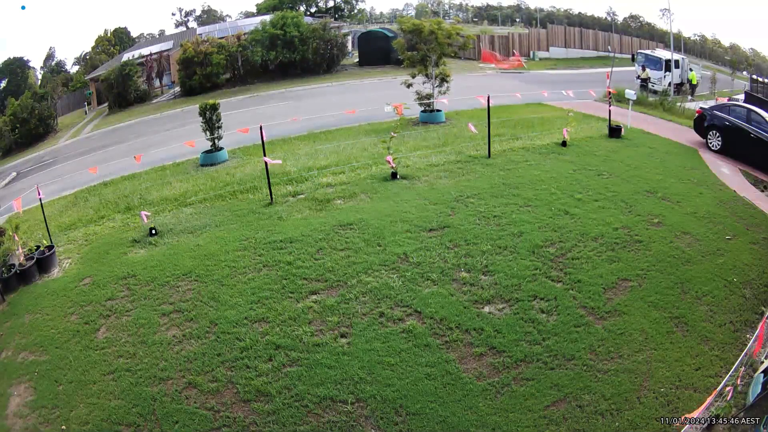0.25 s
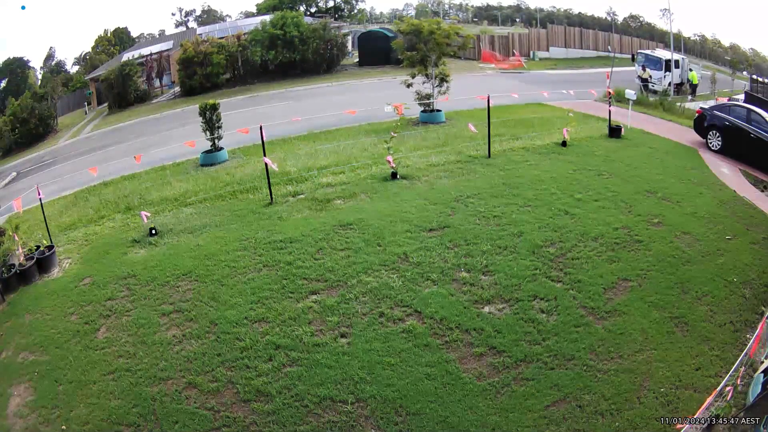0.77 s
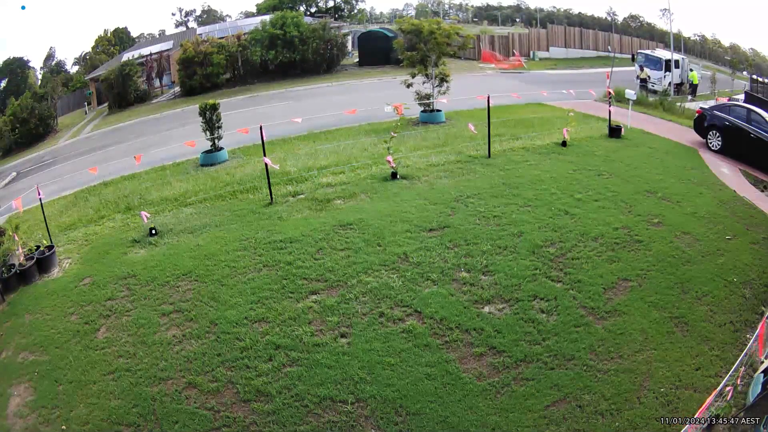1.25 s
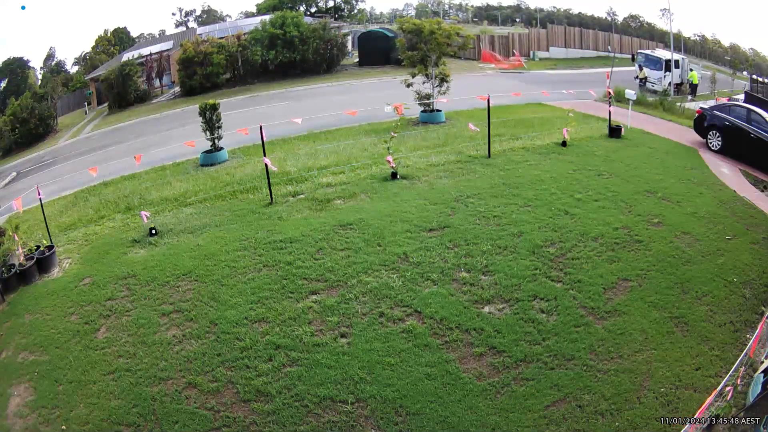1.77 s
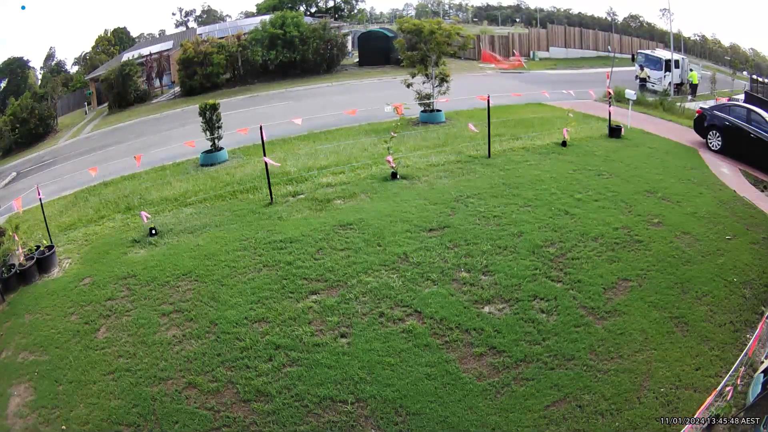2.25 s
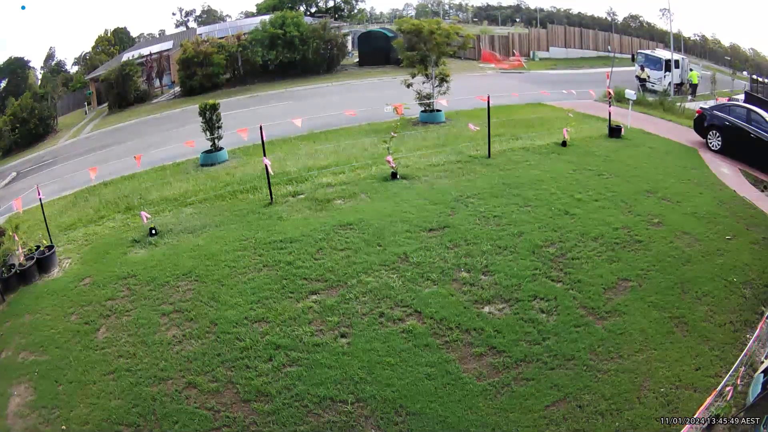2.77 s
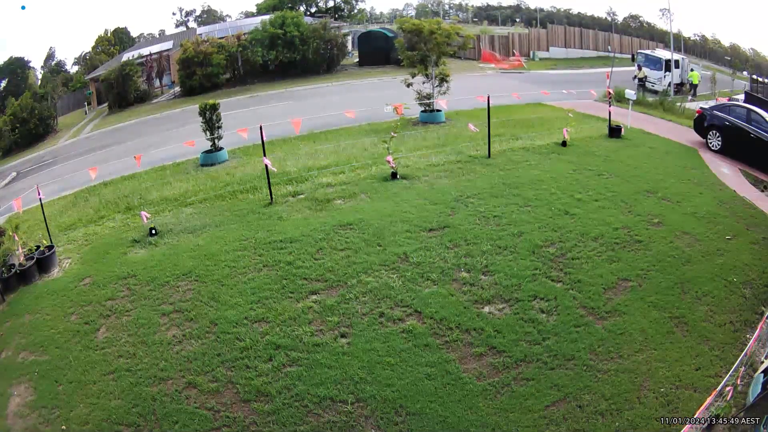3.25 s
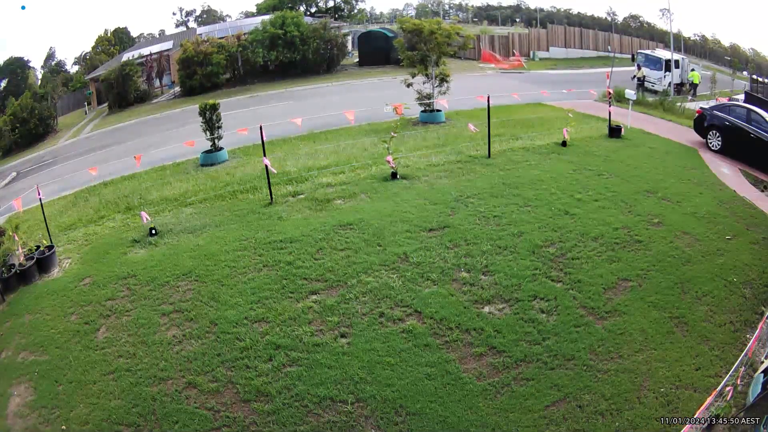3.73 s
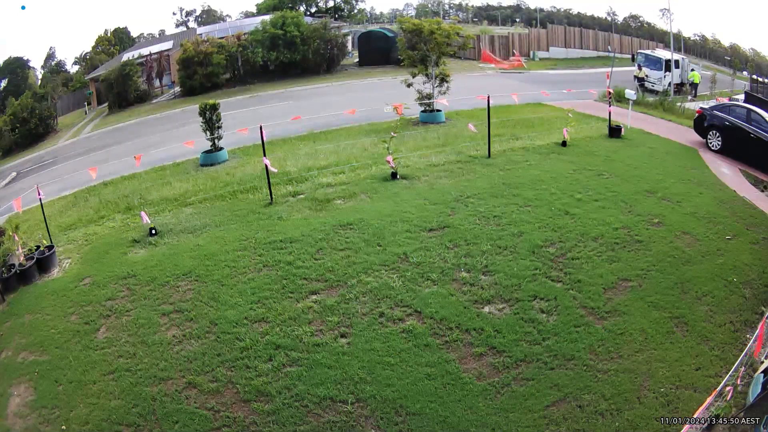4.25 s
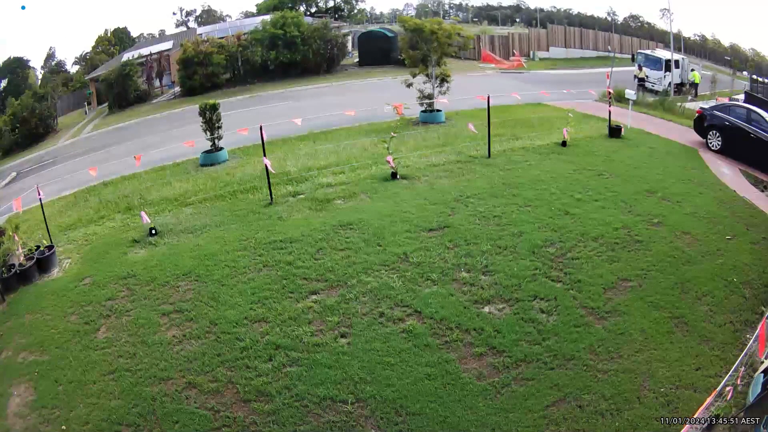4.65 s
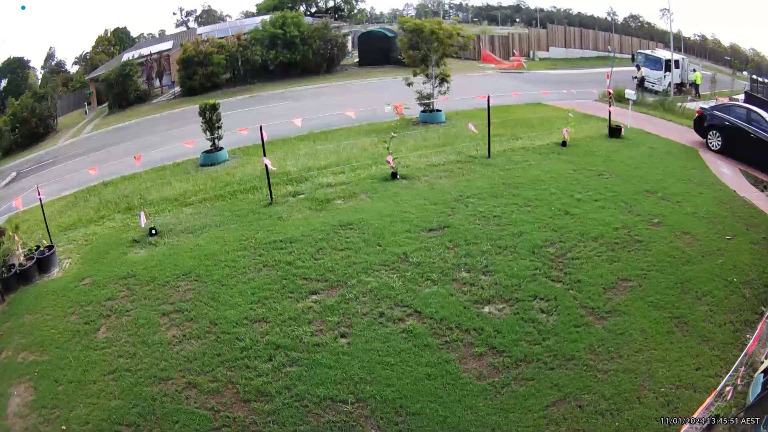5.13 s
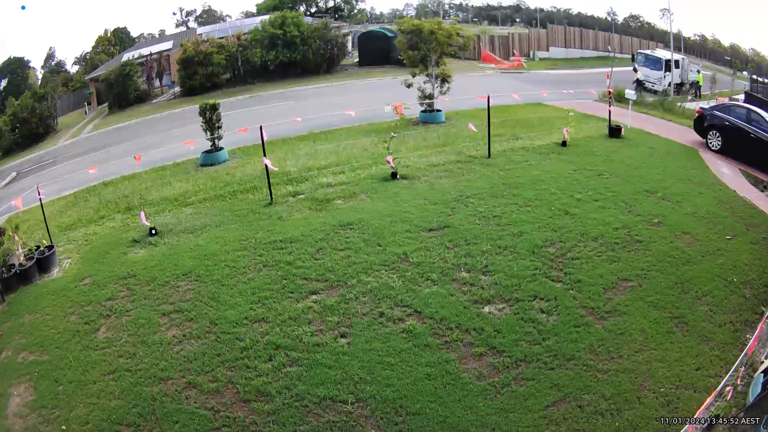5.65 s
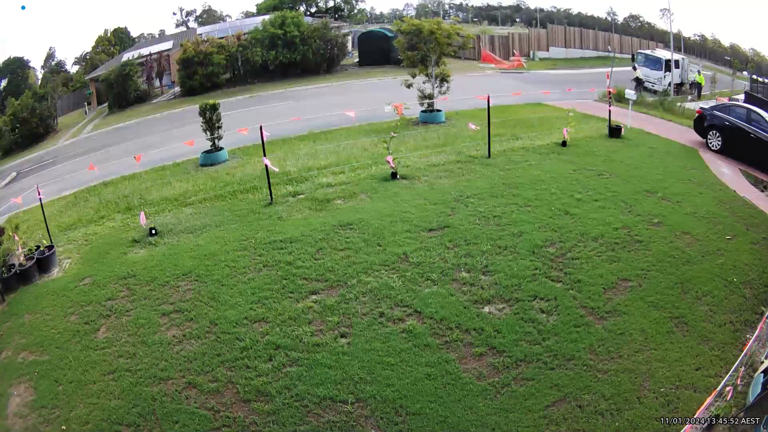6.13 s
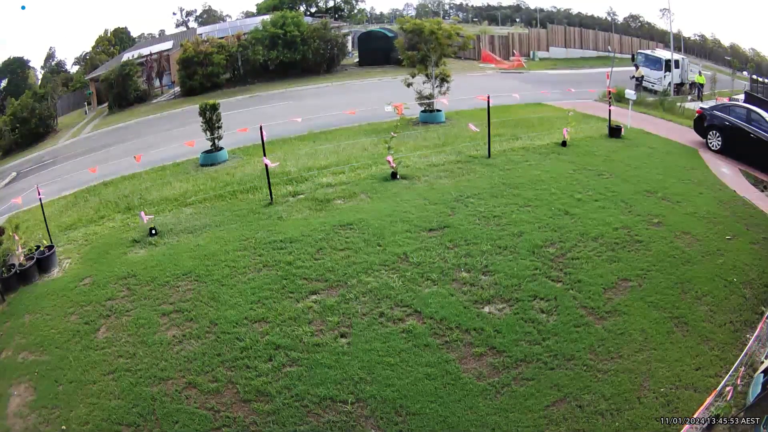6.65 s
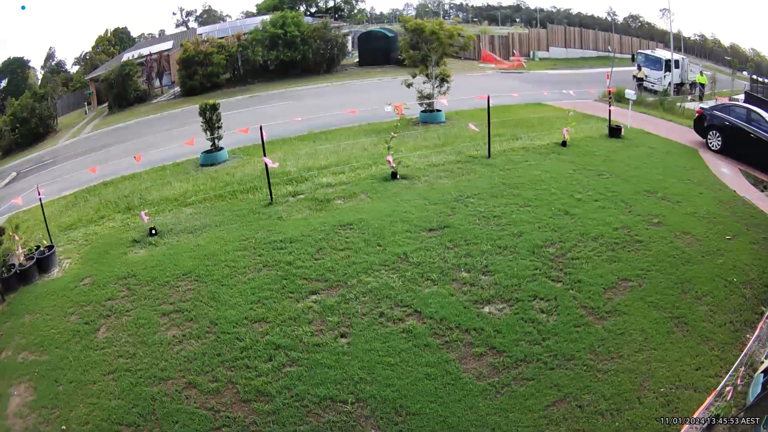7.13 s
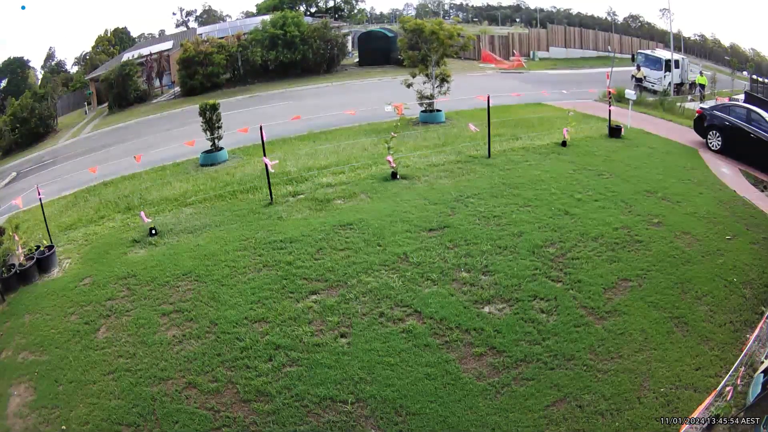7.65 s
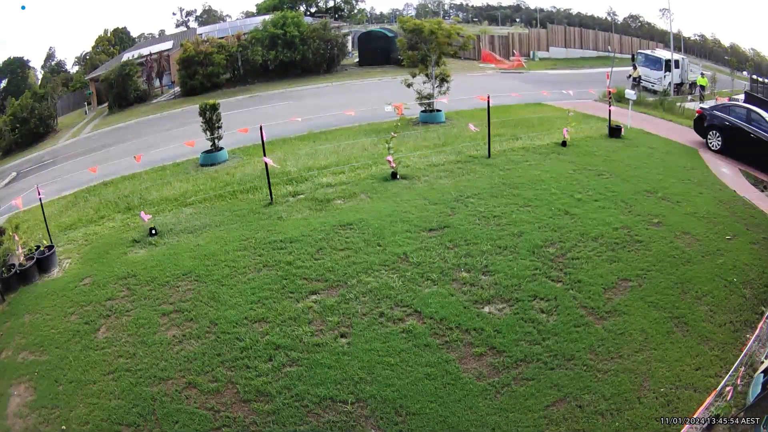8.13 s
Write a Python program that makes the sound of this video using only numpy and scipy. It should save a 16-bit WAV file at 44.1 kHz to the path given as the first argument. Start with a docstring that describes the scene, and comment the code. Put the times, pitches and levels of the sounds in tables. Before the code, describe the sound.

A petrol line trimmer runs near a house wall on a lawn, over very faint low street noise. It starts with a fading rush, then revs up and bites from about 0.3 to 1.4 seconds: dense crackling grass hiss, sharp grit snaps and a short stalk rasp. From 1.5 to 2.1 it mostly whirs and buzzes. A cluster of snaps at 2.1 begins more heavy shredding until about 3.2. Lighter sweeps follow, with a crackling bite from 4.2 to 4.7, then a quieter, wavering engine around 5. At 5.85 a hard burst of clicks and rasping hits, followed by a hollow whine to 6.4 and a brief lull. From 6.85 to 8.1 the strongest cutting returns, harsh and full of snaps, then eases off. Sound is close, with tight wall doubling, rounded peaks and muted top treble.

```python
"""Line trimmer beside a house

A petrol line trimmer is revved in bursts as its head sweeps over a lawn, above a quiet street noise.
Two whirling lines hum as partials and tear the air as pulsed noise; a two-stroke engine buzzes below.
Each bite shreds grass in dense random ticks over a hiss, with snaps of grit and rasps of tough stalks.
The house wall doubles the ticks and snaps, and a narrow-band microphone rounds peaks and cuts the top."""
import sys
import numpy as np
from scipy import signal
from scipy.fft import rfft, irfft
from scipy.io import wavfile
from scipy.ndimage import uniform_filter1d, map_coordinates

SR = 44100
rng = np.random.default_rng(int(sys.argv[2]) if len(sys.argv) > 2 else 0)


def master_out(mix):
    """Clip the mix to full scale and print it as 16-bit PCM to the path in sys.argv[1]."""
    frames = np.transpose(np.atleast_2d(mix))
    ceiling = np.clip(frames, -1, 1)
    pcm = np.round(ceiling * 32767).astype(np.int16)
    wavfile.write(sys.argv[1], SR, pcm)


N = 369999

# colour of grass spray, snaps and exhaust gas: (frequency [Hz], level [dB])
SPRAY_COLOUR = [(600, -29), (1000, -2), (1250, -20.5), (1450, -5.5), (1850, -4.5), (2080, -4.5), (2400, -1),
                (3300, -0.5), (4200, 0.5), (5850, -1), (6450, -9.5), (7400, -15), (8200, -29),
                (9000, -26.5)]
# the head swings nearer and further along the house: (time [s], lag of the wall reflection [ms])
WALL_LAG = [(0, 2.35), (.4, 2.26), (.85, 2.11), (1.5, 2.27), (2.15, 2.32), (2.5, 2.18), (2.85, 2.12),
            (3.2, 2.2), (3.45, 2.34), (3.9, 2.34), (4.15, 2.18), (4.4, 2.12), (4.8, 2.27), (5.7, 2.47),
            (6.9, 2.33), (7.15, 2.18), (7.38, 2.11), (7.65, 2.18), (7.9, 2.28), (8.15, 2.33)]
# skimming harder ground, whose bounce hollows the hiss: (time [s], reflected share [0-1])
HARD_GROUND = [(5.1, 0.02), (5.55, 0.34), (5.9, 0.38), (6.1, 0.55), (6.4, 0.4), (6.8, 0.23)]
WALL_SHARE = .9  # the wall returns snaps almost whole
CRUISE_HZ = 145  # line passes per second at which the speed-bound levels and colours are neutral


def undb(db):
    """Decibels to gain."""
    return 10 ** (np.asarray(db) / 20)


def unit(x):
    """Scale to rms 1."""
    return x / np.sqrt(np.mean(x ** 2))


def power_db(gains):
    """Level of unrelated sounds together: their powers add."""
    return 10 * np.log10(sum(g ** 2 for g in gains))


def curves(table):
    """Each column of a table of (time [s], ..) rows, drawn as straight lines per sample."""
    s, *columns = np.transpose(table)
    return [np.interp(np.arange(N) / SR, s, c) for c in columns]


def walk(rate):
    """Random levels, `rate` of them per second, joined by slopes; spread near 1."""
    k = int(SR / rate)
    held = np.repeat(rng.standard_normal(N // k + 1), k)
    return 1.25 * uniform_filter1d(held, k)[:N]


def swell(start, end, attack, release):
    """Gain that rises, holds from start to end and dies away, 20 dB per attack or release time [s]."""
    t = np.arange(0, N / SR, .001)
    distance = np.maximum((start - t) / attack, (t - end) / release)
    gain = undb(-20 * np.clip(distance, 0, 10))
    return np.interp(np.arange(N) / SR, t, gain)


def colour(x, points, size=4096):
    """Causal filter through (frequency [Hz], level [dB]) points, from the cepstrum of the log gain."""
    hz, db = np.transpose(points)
    bins_hz = np.arange(size // 2 + 1) * SR / size
    gain_db = np.interp(np.log(bins_hz + 1), np.log(hz), db)
    cepstrum = irfft(np.log(undb(gain_db)))
    # folding the cepstrum forward in time makes the filter minimum phase
    cepstrum[1:size // 2] *= 2
    cepstrum[size // 2 + 1:] = 0
    impulse = irfft(np.exp(rfft(cepstrum)))
    return signal.fftconvolve(x, impulse)[:len(x)]


def split(x, hz):
    """The parts of a sound below and above a frequency."""
    low = signal.sosfiltfilt(signal.butter(4, hz, fs=SR, output="sos"), x)
    return low, x - low


def delayed(x, seconds):
    """The sound a moment later; the lag may glide."""
    return map_coordinates(x, [np.arange(N) - seconds * SR], order=3)


def per_turn(turns, depth):
    """A swell once in every turn."""
    return unit(np.exp(depth * np.cos(2 * np.pi * turns)))


def harmonics(turns, orders, flutter_db):
    """Partials locked to a rotation flutter in disturbed air and swell across housing resonances."""
    # resonances of the housing: (frequency [Hz], half width [Hz], lift [dB])
    housing = [(215, 14, 2.5), (388, 32, 4), (615, 28, 5)]
    rate, grid_hz = np.gradient(turns) * SR, np.arange(SR // 20)
    lift = sum(db * np.exp(-((grid_hz - hz) / width) ** 2) for hz, width, db in housing)
    out = np.zeros(N)
    for k, db in orders:
        level_db = db + np.interp(k * rate, grid_hz, lift) + flutter_db * walk(22)
        out += undb(level_db) * np.sin(2 * np.pi * (k * turns + rng.random()))
    return out * np.sqrt(2)


def bounced(x):
    """Hard ground adds a bounce so close behind that it hollows the treble."""
    ground, = curves(HARD_GROUND)
    notch_hz = 3670
    return x + ground * delayed(x, .5 / notch_hz)


def surroundings(x):
    """A bounce off the ground, then faint scatter from fences and trees as decaying noise."""
    x = bounced(x)
    t = np.arange(SR // 2) / SR
    # the scatter starts after 8 ms and falls 60 dB in every 40 ms
    tail = rng.standard_normal(len(t)) * undb(-60 * t / 0.04) * (t > .008)
    return x + undb(-14.0) * signal.fftconvolve(x, tail / np.linalg.norm(tail))[:N]


def street():
    """Quiet street: steady noise weighted to the low end."""
    # colour: (frequency [Hz], level [dB])
    street_colour = [(25, -6), (70, -1), (150, 3.5), (400, -4.5), (1200, -10.5), (4000, -12.5), (8000, -30)]
    return undb(-64.0) * unit(colour(rng.standard_normal(N), street_colour))


def sweeping(hz):
    """Levels of torn air, hiss, hum and engine: speed-bound with the head lifted, swelling in sweeps."""
    # head lifted clear at cruising speed, before each source's trim: (air, hiss, hum, engine [dB])
    clear_levels = (-56, -52.5, -65, -62)
    # change of these levels with speed: (air, hiss, hum, engine [dB per Hz])
    clear_per_hz = (0.19, 0.1, -0.098, -0.17)
    # sweeps low over the lawn, before trims: (start [s], end [s], torn air [dB], then relative to it
    # hiss [dB], hum [dB], engine [dB], attack [s], release [s])
    sweeps = [(0, 0.044, -31, 1.5, -12, -14, .1, 0.6), (0.407, 0.708, -29.5, -6.5, -15, -4.5, 0.22, 0.24),
              (1.162, 1.361, -35, 4.5, -14.5, -9.5, 0.64, 0.14),
              (1.438, 1.622, -32, -1, -11.5, -4.5, .2, 0.2),
              (2.155, 2.267, -30.5, 0.5, -18.5, -8, 0.075, 0.31),
              (2.387, 3.02, -36, 1.5, -17, -10, 0.11, 0.34),
              (3.093, 3.462, -33, -4, -14.5, -7.5, 0.2, 0.15),
              (3.924, 4.174, -33.5, -2, -14, -5, 0.087, 0.44),
              (4.305, 4.589, -34.5, 0.5, -16, -12.5, .2, 0.28), (4.762, 4.987, -55.5, 5.5, -6, 1, .1, 0.13),
              (5.514, 5.822, -43, 3.5, -15, -1.5, .2, 0.13), (5.846, 5.993, -28, -2, -28, -12, 0.079, 0.16),
              (6.07, 6.378, -34.5, 4.5, -14.5, -5.5, 0.11, 0.2),
              (6.877, 7.263, -31.5, -3.5, -12.5, -5.5, .06, 0.43),
              (7.601, 7.998, -30.5, 1, -17.5, -13, .5, 0.39)]
    air, hiss, hum, motor = ([undb(db + per_hz * (hz - CRUISE_HZ))]
                             for db, per_hz in zip(clear_levels, clear_per_hz))
    for start, end, db, hiss_db, hum_db, engine_db, attack, release in sweeps:
        shape = swell(start, end, attack, release)
        air.append(undb(db) * shape)
        hiss.append(undb(db + hiss_db) * shape)
        hum.append(undb(db + hum_db) * shape)
        # the engine roars only under load, so it fades faster than the sweep
        motor.append(undb(db + engine_db) * shape ** 2)
    return [power_db(layer) for layer in (air, hiss, hum, motor)]


def engine(passes, db):
    """Slightly uneven two-stroke firings sound a note, each with a rasp of gas; at times one partial sings."""
    # exhaust note: (multiple of the firing rate, level [dB])
    exhaust_orders = [(1, -19), (2, -5.5), (3, -9), (4, 1.5), (5, -3.5), (6, -10.5), (7, -9), (8, -16),
                      (9, -14), (10, -12)]
    # the exhaust sings out on one clean harmonic: (start [s], end [s], level [dB])
    singing_spells = [(.1, .42, -45), (.98, 1.08, -48), (1.54, 1.605, -39.5), (1.68, 1.734, -54),
                      (4.796, 4.96, -56), (5.0, 5.1, -64), (5.5, 5.85, -50), (6.58, 6.72, -59),
                      (7.051, 7.12, -45)]
    firings_per_pass = .708
    firings = firings_per_pass * passes + 0.009 * walk(60)
    puffs = rng.standard_normal(N) * per_turn(firings, depth=1.05)
    gas = bounced(colour(puffs, SPRAY_COLOUR))
    note = unit(harmonics(firings, exhaust_orders, flutter_db=3.5)) + undb(-1) * unit(gas)
    singing = sum(undb(peak_db) * swell(start, end, attack=.16, release=.15)
                  for start, end, peak_db in singing_spells)
    fifth = harmonics(firings, [(5, 0)], flutter_db=2.5)
    return undb(db) * note + singing * fifth


def lines(passes, hum_db):
    """Whirling lines hum at their pass rate; flexing roughens overtones, which whine over hard ground."""
    # hum: (multiple of the pass rate, level [dB])
    hum_orders = [(1, 0.5), (3, -9)]
    # overtones; the halves come from one line being longer: (multiple of the pass rate, level [dB])
    overtone_orders = [(.5, -19), (1.5, -13), (2, 0), (3, -12), (4, -13), (4.5, -13), (5.5, -13), (6, -9),
                       (6.5, -12), (7, -15)]
    # whine: (multiple of the pass rate, level [dB])
    whine_orders = [(.5, -15), (1.5, -9), (3, 0), (4, -5), (4.5, -11), (5, -5), (5.5, -1.5), (6, -6),
                    (6.5, -9), (7, -6), (7.5, -9), (8, -11), (9, -10)]
    # level of overtones and whine together: (time [s], level [dB])
    overtone_levels = [(0.1, -54), (.37, -38), (.55, -51), (.9, -62), (1.25, -42), (1.65, -53), (1.85, -53),
                       (2.05, -52.5), (2.25, -42), (2.42, -49), (2.95, -49.5), (3.2, -41.5), (3.45, -60),
                       (3.68, -61), (3.9, -49), (4.6, -46.5), (4.72, -60), (5.0, -62), (5.28, -75),
                       (5.52, -44), (5.85, -43.5), (6.25, -38), (6.4, -38.5), (6.57, -64.5), (6.82, -47.5),
                       (7.65, -44), (8.3, -58)]
    (ground,), (overtone_db,) = curves(HARD_GROUND), curves(overtone_levels)
    flexing = passes + 0.0061 * walk(40)
    whine_db = -16 + 26.5 * ground
    whine = undb(whine_db) * harmonics(flexing, whine_orders, flutter_db=1.7)
    overtones = harmonics(flexing, overtone_orders, flutter_db=2.0) + whine
    hum = harmonics(passes, hum_orders, flutter_db=2.0)
    return undb(hum_db) * hum + undb(overtone_db) * overtones


def rush(passes, hz, db):
    """Turbulence behind the lines swells at every pass and brightens as the head speeds up."""
    # colour of torn air: (frequency [Hz], level [dB])
    air_colour = [(25, -14), (60, -16), (110, -11), (190, -3), (265, -6), (380, 4), (490, -1.5), (620, 2.5),
                  (710, -3), (860, -0.5), (1060, -1.5), (1280, -7.5), (1700, -6.5), (3000, -52.5)]
    gusts = undb(1.4 * walk(45))
    eddies = rng.standard_normal(N) * per_turn(passes, depth=0.36) * gusts
    low, high = split(unit(colour(eddies, air_colour)), hz=686)
    tilt_db = 0.1 * (hz - CRUISE_HZ)
    return undb(db - 1.0) * (undb(-tilt_db) * low + undb(tilt_db) * high)


def scrapes():
    """The line drags over a tough stalk: flickering noise rasps in one broad resonance."""
    # before the surroundings: (start [s], end [s], level [dB], resonance [Hz])
    stalks = [(0.332, 0.365, -39, 3600), (.43, .48, -29, 3400), (2.283, 2.31, -27, 2500),
              (5.472, 5.505, -40, 2830), (6.0, 6.058, -27.5, 2400), (6.04, 6.13, -33.5, 1690),
              (6.843, 6.856, -26, 2905), (6.879, 6.899, -23, 2900)]
    grain = rng.standard_normal(N) * undb(3.9 * walk(400))
    out = np.zeros(N)
    for start, end, db, hz in stalks:
        b, a = signal.iirpeak(hz, 2.15, fs=SR)
        once = signal.lfilter(b, a, grain)
        rasp = unit(signal.lfilter(b, a, once))
        out += undb(db) * rasp * swell(start, end, attack=.012, release=.02)
    return out


def strikes():
    """Grit or a twig gives a sharp snap and brief ring among faint splinters, doubled by the wall."""
    # relative: (time [s], peak level [dB], ringing pitch [Hz], ring against snap [dB])
    grit = [(0.0293, -16, 3000, 4), (.4004, -6, 5530, -9), (.603, -7, 5400, 12), (.688, -8, 5700, 18),
            (.7456, -4, 5000, -6), (0.8493, -1.5, 5830, 13), (0.9506, -8, 3760, 9), (.952, -8, 3787, 9),
            (0.9623, -11, 4200, 15), (1.0174, -4, 3970, 19), (1.3084, -2.5, 4170, 2), (1.380, -10, 5000, 6),
            (1.431, -5, 5995, 11), (1.5402, -16.5, 4500, 0), (2.1412, -7, 4500, -11), (2.146, -1, 4680, 0),
            (2.1509, -9, 4500, -2), (2.1694, -9, 2980, -4), (2.172, -8, 2800, 3), (2.1966, -3, 3870, -12),
            (2.2159, -3, 2570, -3), (2.3055, -9, 2610, 0), (2.5329, -9, 4250, 5), (2.558, -5.5, 3830, 9),
            (2.5879, -6, 5700, 0), (2.6074, -4.5, 5000, 1), (2.738, -3, 5930, 16), (2.755, -1.5, 5390, 4),
            (3.087, -8, 4500, 0), (3.115, -9, 5464, 19), (3.4905, -19.5, 4500, -3), (3.850, -26.5, 2612, 2),
            (3.913, -25, 2500, 1), (3.9587, -17, 3500, 0), (3.9891, -14, 3997, -3),
            (4.2053, -6.5, 4570, 24), (4.2154, -14, 4500, 17), (4.2848, -4.5, 5650, 18),
            (4.520, -11, 4000, 4), (4.6555, -12, 4770, 8), (4.807, -27, 5600, 6), (4.8613, -24.5, 4160, 12),
            (5.849, -3, 2380, 1), (5.8518, -1, 2400, -4), (5.8545, -4, 4795, -4), (5.8814, -1, 4800, -8),
            (5.901, -2.5, 3200, -2), (5.9615, -4, 2060, -6), (5.9886, -3, 2400, 0), (6.846, -12, 2887, 16),
            (6.854, -8.5, 2720, 19), (6.881, -5, 2880, 18), (6.8983, -3.5, 3020, -1),
            (6.9073, -1, 4800, -6), (6.913, -5, 5000, -3), (6.9454, -0.5, 3370, 1), (6.997, -6, 3007, -3),
            (7.115, -8, 5000, 4), (7.134, -3, 5035, -12), (7.196, -1.5, 4474, 8), (7.429, -6, 4800, 4),
            (7.540, -5, 4510, 2), (7.6051, -3.5, 4494, 0), (7.669, -2, 4976, 1), (7.7203, -1, 3706, -1),
            (7.7872, 0, 4173, -14), (7.8167, -4, 3190, -5), (7.8829, -1, 3460, -12), (8.0334, -6, 3982, 3),
            (8.045, -9, 3800, 8)]
    length, lead = 2048, 400  # samples; the splinters begin a little ahead of the snap
    out = np.zeros(N + length)
    t = (np.arange(length) - lead) / SR
    splinters = np.where(t < 0, np.exp(-np.abs(t) / 0.003), np.exp(-np.abs(t) / 0.0035))
    for s, db, hz, ring_db in grit:
        burst = 0.045 * rng.standard_normal(length) * splinters
        burst[lead] += 1
        snap = colour(burst, SPRAY_COLOUR)
        ring = signal.lfilter(*signal.iirpeak(hz, 5.0, fs=SR), snap)
        snap = unit(snap) + undb(ring_db) * unit(ring)
        i = int(s * SR) - lead
        out[i:i + length] += undb(db) * snap / np.abs(snap).max()
    direct = out[:N]
    wall_ms, = curves(WALL_LAG)
    return direct + WALL_SHARE * delayed(direct, wall_ms / 1000)


def biting(hiss_db):
    """Levels of coarse stalks, thick blades, thin blades and fine spray: bites add to the sweep's hiss."""
    # bites into the grass, before trims: (start [s], end [s], shredding [dB], coarse stalks relative [dB],
    # thin against thick blades [dB], fine spray relative [dB], attack [s], release [s])
    bites = [(.335, 0.4, -29.5, -3, -11, -24, .05, 0.063), (0.38, 0.567, -25, -2.5, -2, -10, 0.038, 0.058),
             (0.618, 0.66, -21, -17, 9, -11, 0.038, 0.039),
             (0.688, 0.83, -21.5, -9, 3.5, -3.5, 0.023, 0.057),
             (0.891, 0.94, -21, -13.5, 3.5, -17, 0.08, 0.043),
             (.962, 0.99, -21.5, -11, -1, -19, 0.018, .05), (1.033, 1.33, -20.5, -11.5, 3, -18, .03, 0.1),
             (1.308, 1.296, -18.5, -1, 1, -6.5, 0.006, 0.08), (1.38, 1.415, -22.5, -14, 9, -4, 0.054, 0.2),
             (2.209, 2.31, -20.5, -1.5, -1, -9.5, 0.025, 0.016),
             (2.321, 2.5, -20, -15.5, -3.5, -11, 0.043, 0.41),
             (2.59, 2.625, -17.5, -11, -5.5, -5, 0.012, 0.048),
             (2.665, 2.72, -18, -18.5, 3.5, -10.5, 0.068, 0.16),
             (2.787, 2.91, -21.5, -22, -0.5, -20, 0.054, 0.3),
             (3.053, 3.133, -22.5, -10.5, 4, -10, 0.21, 0.18), (3.443, 3.395, -33, 0, 2, 0.5, 0.077, 0.16),
             (3.916, 3.96, -38, 5, -2.5, -0.5, 0.025, 0.094),
             (4.085, 4.28, -31.5, -22.5, 21, -3.5, 0.085, 0.12),
             (4.288, 4.5, -21.5, -21, -1.5, -9, .015, 0.085),
             (4.482, 4.61, -22.5, -19, 0.5, -23, 0.069, 0.21),
             (5.887, 5.993, -18.3, -1.5, 7, -15.5, 0.08, 0.16),
             (6.094, 6.33, -33.5, -2.5, 7, -8, 0.07, 0.12), (6.89, 6.912, -20, 5, 1.5, -12, .015, 0.011),
             (6.96, 7.012, -25, 4, -4.5, -11.5, 0.035, 0.13), (7.103, 7.19, -17, -11, -1, -11, 0.28, 0.06),
             (7.206, 7.37, -18.5, -9, -3.5, -16.5, 0.047, 0.15),
             (7.425, 7.58, -16.5, -11, -4, -14.5, 0.061, 0.16),
             (7.66, 7.7, -14, -10.5, -4.5, -13.5, 0.06, 0.1),
             (7.755, 7.77, -14.5, -6.5, -6.5, -12.5, .05, .15),
             (7.915, 8.05, -24, -3.5, -7, -19, 0.07, 0.19), (8.383, 8.6, -37.5, 4, 3, -1, 0.034, .1)]
    hiss_mix_db = [-1, 0, 0, -11.5]
    power = np.outer(undb(hiss_mix_db), undb(hiss_db)) ** 2
    for start, end, db, coarse_db, thin_db, fine_db, attack, release in bites:
        mix = undb(db + np.array([coarse_db, -thin_db / 2, thin_db / 2, fine_db]))
        power += np.outer(mix ** 2, swell(start, end, attack, release) ** 2)
    return 10 * np.log10(power)


def snapping(passes):
    """Blades snap in a bunch at every pass; each breaks at its own spot, so its wall echo has its own lag."""
    ticks_per_s, spread_ms = 2200, .014
    wall_ms, = curves(WALL_LAG)
    at = np.flatnonzero(rng.random(N) < ticks_per_s / SR * per_turn(passes, depth=0.45))
    size_db = 3.6 * np.minimum(rng.exponential(size=len(at)), 3.0)
    sizes = undb(size_db) * rng.choice([-1, 1], len(at))
    lag = (wall_ms[at] + spread_ms * rng.standard_normal(len(at))) * SR / 1000
    direct = np.bincount(at, sizes, N)
    echoes = np.bincount(at + np.round(lag).astype(int), sizes, N)[:N]
    return unit(direct + WALL_SHARE * echoes)


def torn_grass(passes, bite):
    """Ticks mixed with hiss by the strength of the bite, fed in unevenly."""
    mix = np.sqrt(bite) * snapping(passes) + np.sqrt(1 - bite) * rng.standard_normal(N)
    return colour(mix * undb(0.57 * bite * walk(110)), SPRAY_COLOUR)


def tufts(x, hz, depth_db, rate):
    """Every tuft has its own mix: the bands either side of a frequency waver separately."""
    return sum(part * undb(depth_db * walk(rate)) for part in split(x, hz))


def shredding(passes, coarse_db, thick_db, thin_db, fine_db):
    """Blades snap in dense ticks over a hiss; the harder the cut, the more the ticks stand out."""
    db = (thick_db + thin_db) / 2
    bite = np.clip(0.9 / (1 + np.exp(-(db + 36.0) / 4)), 0, .98)
    # blades and fine chaff snap separately
    spray, chaff = torn_grass(passes, bite), torn_grass(passes, bite)
    _, spray = split(spray, hz=1060)
    coarse, rest = split(spray, hz=3100)
    blades, _ = split(rest, hz=5770)
    thick, thin = split(blades, hz=4210)
    _, fine = split(spray + chaff, hz=5750)
    coarse = unit(tufts(coarse, 2170, 2.0 * bite, rate=70))
    thick = unit(tufts(thick, 3650, 2.2 * bite, rate=45))
    thin = unit(tufts(thin, 4950, 2.2 * bite, rate=45))
    stalks_and_spray = undb(coarse_db - 2.5) * coarse + undb(fine_db - 0.03) * unit(fine)
    return undb(thick_db - 7.5) * thick + undb(thin_db - 7.5) * thin + stalks_and_spray


def scene():
    """Head speed and sweeps drive the tones and the rush, bites add the shredding, over a quiet street."""
    # the head sags under load and between squeezes of the throttle: (time [s], line passes per second [Hz])
    head_speed = [(0.0, 119.7), (0.27, 152.4), (0.34, 151.4), (0.9, 124.6), (1.1, 151.2), (1.29, 153.5),
                  (1.63, 134.2), (1.82, 157.1), (2.11, 156.2), (2.35, 143.1), (2.97, 155.9), (3.46, 131.7),
                  (3.69, 153.4), (3.89, 157.2), (4.02, 142.4), (4.14, 137.4), (4.62, 148.5), (4.77, 119),
                  (5.0, 149.9), (5.2, 122.4), (5.29, 124), (5.48, 154.9), (5.81, 157.7), (5.87, 150.7),
                  (6.38, 154.9), (6.54, 129.7), (6.81, 157.2), (7.05, 138.5), (7.15, 136.2), (7.67, 155),
                  (8.1, 116.7), (8.39, 147)]
    hz, = curves(head_speed)
    passes = np.cumsum(hz * (1 + 0.0023 * walk(24.92))) / SR
    air_db, hiss_db, hum_db, engine_db = sweeping(hz)
    machine = engine(passes, engine_db) + lines(passes, hum_db) + rush(passes, hz, air_db)
    grass = undb(0.43) * shredding(passes, *biting(hiss_db))
    cutting = scrapes() + undb(2.5) * strikes() + grass
    return (street() + machine + surroundings(cutting))[None]


def record(dry):
    """A narrow-band microphone: the tallest peaks are rounded off and the top is cut steeply."""
    rounded = dry / (1 + (dry / .88) ** 6) ** (1 / 6)
    top_hz = 8600
    return signal.fftconvolve(rounded, signal.firwin(161, top_hz, fs=SR)[None], mode="same")


dry = scene()
out = record(dry)
master_out(out)
```